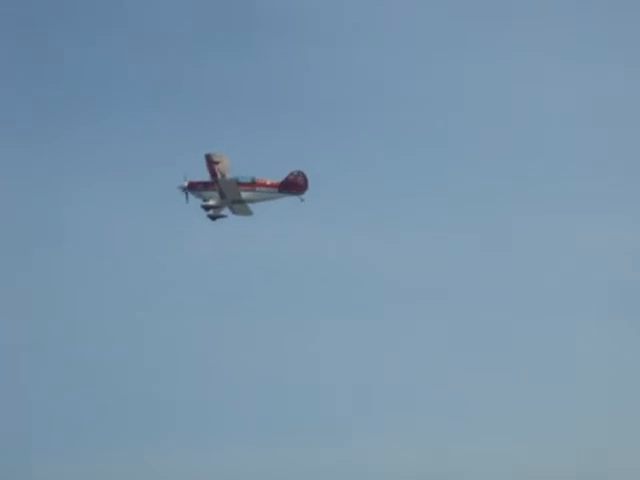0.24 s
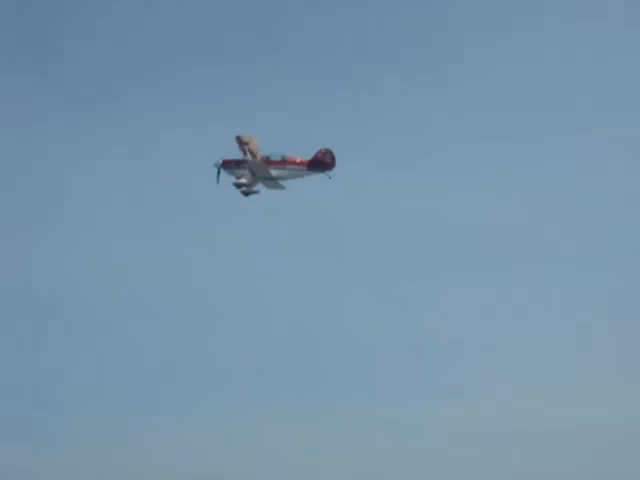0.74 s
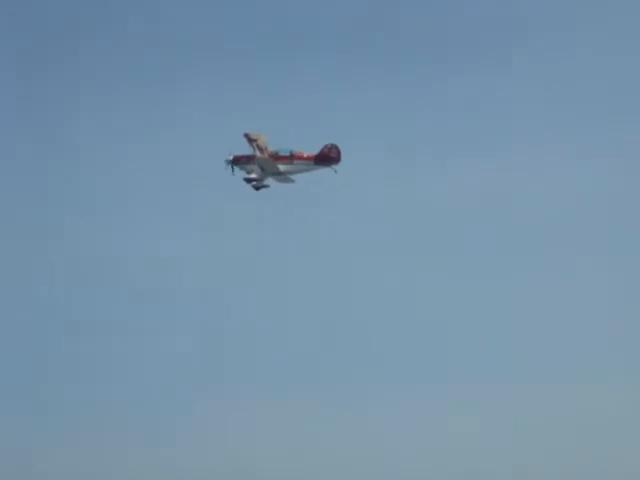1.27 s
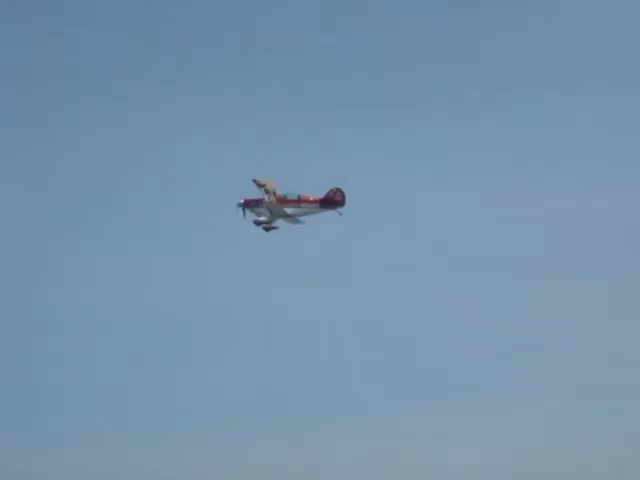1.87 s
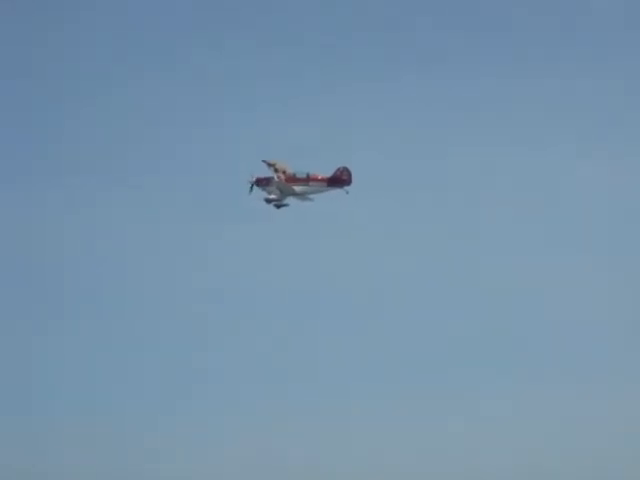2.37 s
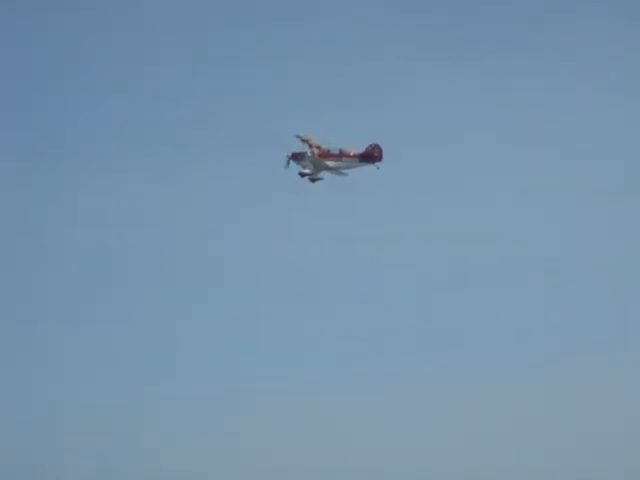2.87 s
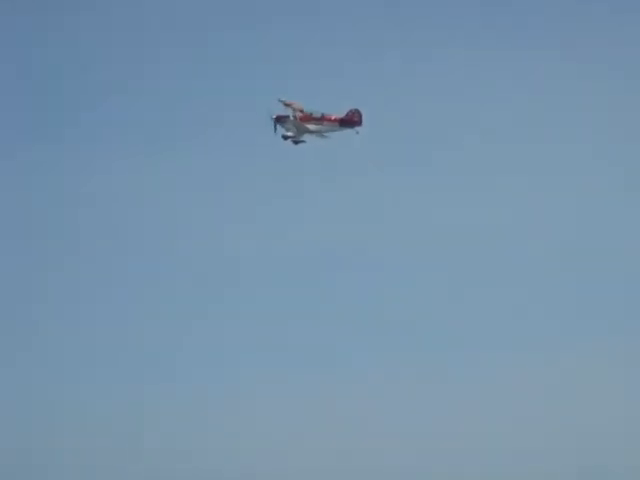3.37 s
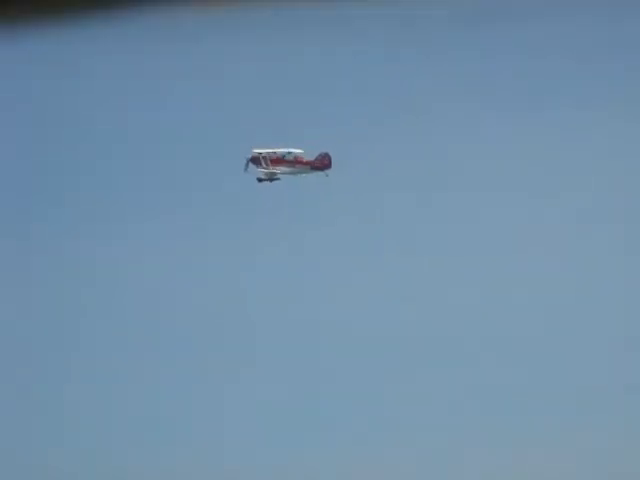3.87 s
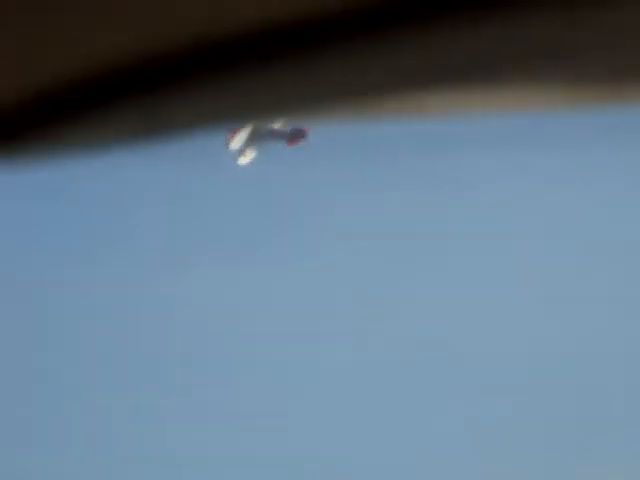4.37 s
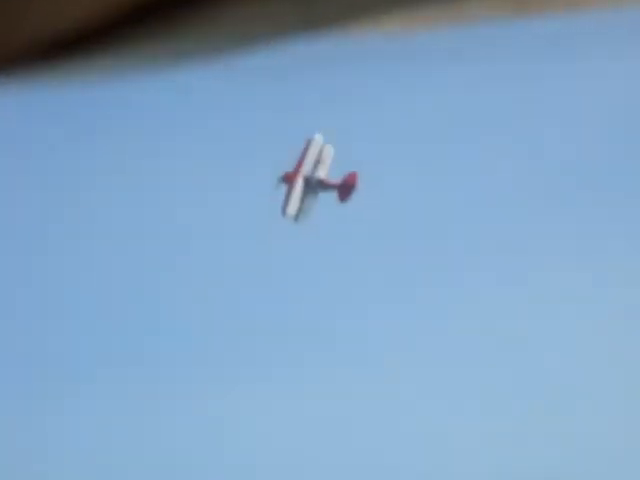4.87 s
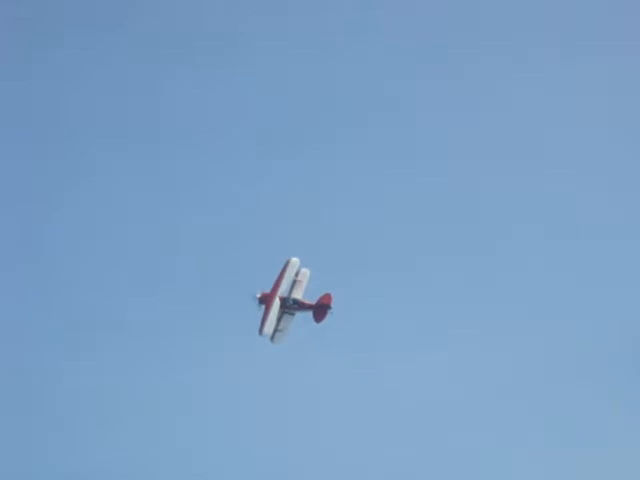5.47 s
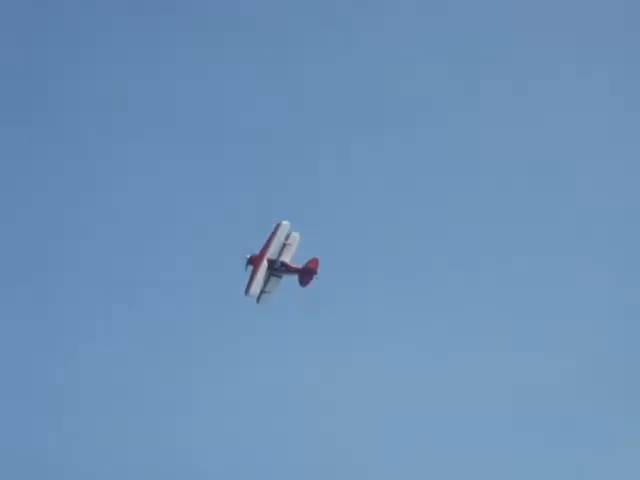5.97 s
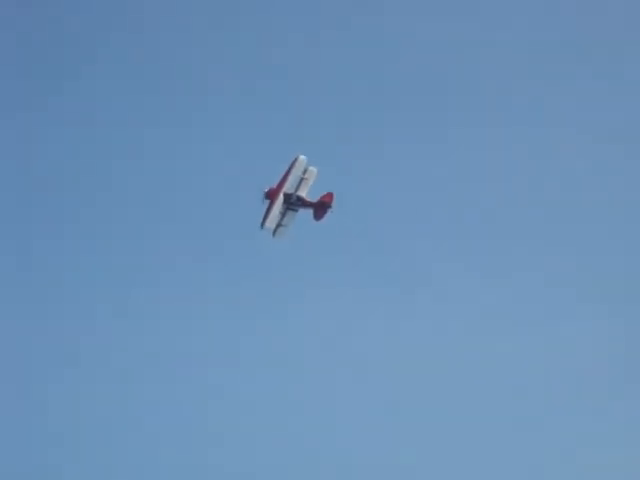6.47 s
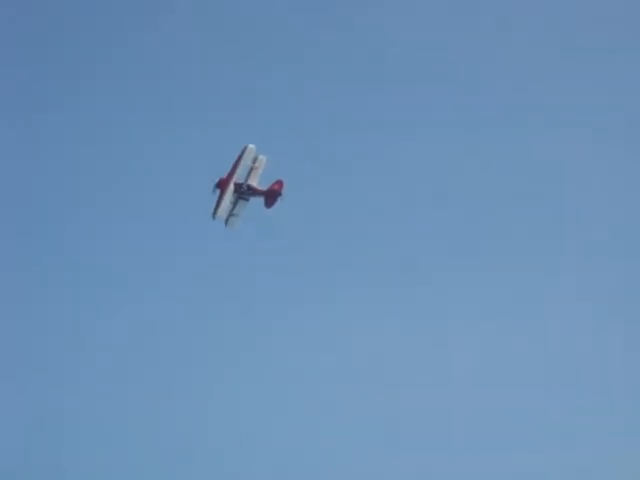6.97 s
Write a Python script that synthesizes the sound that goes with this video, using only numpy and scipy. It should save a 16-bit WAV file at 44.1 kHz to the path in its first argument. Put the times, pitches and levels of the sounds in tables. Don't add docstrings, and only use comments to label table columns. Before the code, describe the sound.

A small piston-engine biplane drones without a break in open sky. The tone is steady and buzzy, rich in harmonics, over a dull midrange roar and a bright rush of air pulsing rapidly with the propeller. Pitch stays almost fixed, sagging very slightly. After about five seconds the hiss softens and changes colour while a knocking edge emerges. A small camera microphone gives thin bass and slightly watery treble.

```python
import sys
import numpy as np
from scipy import signal
from scipy.fft import rfft, irfft
from scipy.io import wavfile
from scipy.ndimage import uniform_filter1d

SR = 44100
rng = np.random.default_rng(int(sys.argv[2]) if len(sys.argv) > 2 else 0)


def dump(signal):
    limited = np.clip(np.atleast_2d(signal).T, -1, 1)
    pcm = np.round(limited * 32767).astype(np.int16)
    wavfile.write(sys.argv[1], SR, pcm)


def voltage_ratio(level):
    return 10 ** (np.asarray(level, float) / 20)


N = 318825

# time_s [s], cycle_rate_hz [cycles per s]
ENGINE_SPEED = [
    (0.0, 21.54),
    (1.7, 21.584),
    (2.5, 21.566),
    (4.0, 21.5),
    (5.7, 21.512),
    (6.5, 21.487),
    (7.23, 21.487),
]
# time_s [s], swing [0-1], comb_spacing_hz [Hz, from an echo off a near surface],
# comb_depth_db [dB], panel_ring_db [dB]
MIC_AIM = [
    (0, .2, 1410, 0, 3),
    (.5, 0.1, 1390, .3, -0.5),
    (1.3, 0.01, 1190, 1.3, 1),
    (2.5, 0, 1150, 2.1, 2),
    (3.1, 0.1, 1230, 0, 1),
    (3.8, 0, 1265, 0, 3),
    (5.05, 0, 1100, 0.7, 4),
    (5.4, 0.47, 1330, 1.6, 4),
    (5.9, 0.73, 1400, 0.9, 1),
    (7.23, 0.9, 1350, 1.5, 0.5),
]
THUMP = (.25, 33, 37)
CABIN_HZ, CABIN_WIDTH_HZ = 810, 130


def evened(x):
    return x / np.sqrt(np.mean(x ** 2) + 1e-20)


def read(points, hz):
    point_hz, value = np.transpose(points)
    return np.interp(np.log(hz + 1), np.log(point_hz + 1), value)


def follow(rows, t):
    time_s, *columns = np.transpose(rows)
    return [np.interp(t, time_s, column) for column in columns]


def mic_swing(t):
    return follow(MIC_AIM, t)[0]


def wander(t, top_hz, count=20):
    rates_hz = np.geomspace(.2, top_hz, count)
    return evened(sum(np.sin(2 * np.pi * (f * t + rng.random())) / np.sqrt(f) for f in rates_hz))


def bell(hz, centre_hz, width_hz):
    return np.exp(-.5 * ((hz - centre_hz) / width_hz) ** 2)


def noise(shape_db, size, patchy_db):
    hop = size // 4
    frames = N // hop + 5
    hz = np.fft.rfftfreq(size, 1 / SR)[:, None]
    real, imaginary, patches = rng.standard_normal((frames, len(hz), 3)).T
    patches = uniform_filter1d(patches, size=5, axis=0)
    patches = evened(uniform_filter1d(patches, size=110, axis=1))
    level_db = shape_db(hz, np.arange(frames) * hop / SR) + patchy_db * patches
    spectra = (real + 1j * imaginary) * voltage_ratio(level_db)
    return evened(signal.istft(spectra, nperseg=size, noverlap=size - hop)[1][:N])


def cycles():
    return np.cumsum(follow(ENGINE_SPEED, np.arange(N) / SR)[0]) / SR


def cabin_lift_db(t):
    return -0.56 + 2 * mic_swing(t)


def order_phase(multiple):
    turn, first, last = THUMP
    if first <= multiple <= last:
        return -multiple * turn
    return .306 * multiple ** 2


def engine():
    # order [multiple of the cycle rate], level_db [dB rms]
    strong_orders = [(4, -40.9), (6, -44.6), (8, -28.2), (9, -37.0), (10, -45.6), (12, -33.6), (13, -39.5),
                     (14, -41.1), (15, -40.7), (16, -33.7), (17, -43.6), (18, -35.5), (20, -37.5),
                     (24, -34.8), (25, -40.9), (26, -34.2), (27, -42.5), (28, -40.4), (29, -46.0),
                     (30, -43.8), (31, -42.6), (32, -37.2), (33, -37.3), (34, -40.8), (35, -39.2),
                     (36, -38.7), (37, -33.6), (39, -45.0), (40, -42.2), (48, -45.1)]
    cancelled_orders = {7: -52, 21: -58}
    levels = dict(strong_orders) | cancelled_orders
    minor_db, top_order = -48, 55

    turns, t = cycles(), np.arange(N) / SR
    slow = np.arange(0, N / SR + .02, .01)
    swing, lift_db = mic_swing(slow), cabin_lift_db(slow)
    thump_db = -1.5 + 5.5 * swing
    blade_db = -0.5 * swing + 2 * wander(slow, 1.5)
    _, first, last = THUMP
    out = np.zeros(N)
    for multiple in range(4, top_order):
        hz = multiple * ENGINE_SPEED[0][1]
        weak_db = minor_db - 5 * rng.random() * (multiple > 40)
        level_db = levels.get(multiple, weak_db) + .5 * wander(slow, 4)
        level_db += 1.2 * lift_db * bell(hz, CABIN_HZ, CABIN_WIDTH_HZ)
        level_db += blade_db * (multiple == 4)
        level_db += thump_db * (first <= multiple < last)
        tone = np.cos(2 * np.pi * (multiple * turns + order_phase(multiple)))
        out += np.interp(t, slow, voltage_ratio(level_db)) * tone
    return np.sqrt(2) * out


def roar():
    # pitch_hz [Hz], level_db [dB per Hz]
    roar_colour = [(25, -26), (50, -26), (70, -15), (95, -8.5), (110, -2.5), (200, -2), (330, 0.5),
                   (480, -1), (600, 0), (780, 1.5), (900, -1), (1200, -6.5), (1600, -10.5), (2200, -21)]

    def shape_db(hz, t):
        level_db = -0.2 * mic_swing(t) - 0.13 * wander(t, 1.45)
        cabin_db = cabin_lift_db(t) * bell(hz, CABIN_HZ, CABIN_WIDTH_HZ)
        return read(roar_colour, hz) + level_db + cabin_db

    return voltage_ratio(-24) * noise(shape_db, size=4096, patchy_db=-0.07)


def slipstream():
    # pitch_hz [Hz], level_db [dB per Hz]
    hiss_ahead = [(600, -36), (1000, -5), (1330, -11), (1680, -4.5), (1950, -7.5), (2200, -2.5),
                  (3000, -4.5), (3500, -5), (4700, -8), (5100, -9), (5400, -11), (6500, -14.5), (8700, -15),
                  (10300, -15.5)]
    # pitch_hz [Hz], level_db [dB per Hz]
    hiss_turned = [(600, -35), (1000, -8.5), (1400, -8.5), (1950, -5), (2250, -1.5), (2800, 0.5),
                   (3500, -0.5), (4100, -2), (4900, -4), (5300, -9.5), (6100, -12.5), (7400, -14),
                   (8500, -17), (10300, -15.5)]

    def shape_db(hz, t):
        swing, spacing_hz, comb_db, panel_db = follow(MIC_AIM, t)
        panel_hz = 2920 + .75 * (spacing_hz - 1150)
        colour_db = (1 - swing) * read(hiss_ahead, hz) + swing * read(hiss_turned, hz)
        colour_db = colour_db + panel_db * bell(hz, panel_hz, 150)
        colour_db += comb_db * np.cos(2 * np.pi * hz / spacing_hz) * bell(hz, 3700, 1700)
        return colour_db - 18 * np.log2(np.maximum(1300 / (hz + 1), 1))

    t = np.arange(N) / SR
    blades = 1 + .05 * np.cos(2 * np.pi * (4 * cycles() + .3))
    flutter = evened(uniform_filter1d(rng.standard_normal(N), size=350))
    gusts_db = .15 * wander(t, 7.3) + .5 * flutter
    level_db = -16 - 2.5 * mic_swing(t) + gusts_db
    return voltage_ratio(level_db) * blades * noise(shape_db, size=1024, patchy_db=0.37)


def scene():
    mono = engine() + roar() + slipstream()
    return np.array([mono, mono])


def round_peaks(x):
    return x / (1 + (x / .85) ** 4) ** .25


def thin_treble(x):
    hz, t, spectra = signal.stft(x, SR, nperseg=256, noverlap=192)
    chance = rng.random((len(t) // 6 + 1, 44)).T
    patches = np.repeat(np.repeat(chance, 3, axis=0), 6, axis=1)
    patches = patches[1:len(hz) + 1, :len(t)]
    lost_share = .065 * np.clip((hz - 4500) / 1500, 0, 1) + .1 * (hz > 9600)
    kept = spectra * (patches > lost_share[:, None])
    thinned = signal.istft(kept, SR, nperseg=256, noverlap=192)[1][:N]
    low_pass = signal.firwin(601, 10024, window=("kaiser", 9), fs=SR)
    return signal.oaconvolve(thinned, low_pass, "same")


def tick():
    out = np.zeros(N)
    start = round(.058 * SR) - 64
    out[start:start + 129] = -voltage_ratio(-26) * signal.firwin(129, 15800, fs=SR)
    return out


def side_bursts():
    # centre_s [s], low_hz [Hz], high_hz [Hz], level_db [dB rms]
    bursts = [
        (.252, 4190, 5150, -34),
        (.856, 4220, 5170, -35),
        (1.761, 4650, 6280, -34),
        (2.156, 5700, 6920, -36),
        (2.156, 7570, 8960, -39),
        (2.76, 5150, 6240, -36),
        (3.271, 6270, 8280, -37),
        (5.941, 7570, 8980, -41),
        (6.336, 6270, 7600, -38),
    ]
    side, hz = np.zeros(N), np.fft.rfftfreq(2048, 1 / SR)
    fade = signal.windows.kaiser_bessel_derived(2048, 4 * np.pi)
    for centre_s, low_hz, high_hz, level_db in bursts:
        spectrum = rfft(rng.standard_normal(2048))
        band = irfft(spectrum * (hz > low_hz) * (hz < high_hz))
        start = round(centre_s * SR) - 1024
        side[start:start + 2048] += voltage_ratio(level_db) * evened(band * fade)
    return side


def top_cut(x):
    return signal.sosfilt(signal.butter(12, 16000, fs=SR, output="sos"), x)


def record(dry):
    mono = thin_treble(round_peaks(dry[0])) + tick()
    side = side_bursts()
    return top_cut(np.array([mono + side, mono - side]))


dry = scene()
out = record(dry)
dump(out)
```